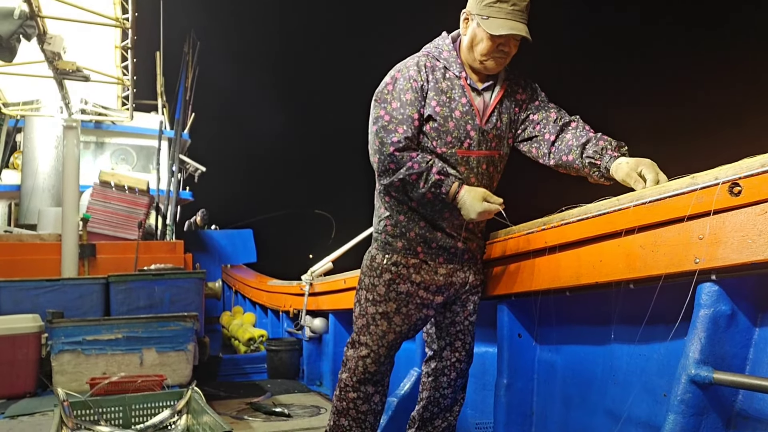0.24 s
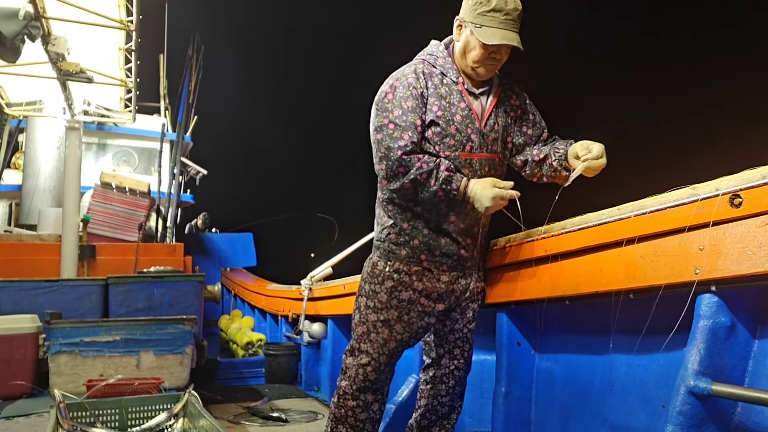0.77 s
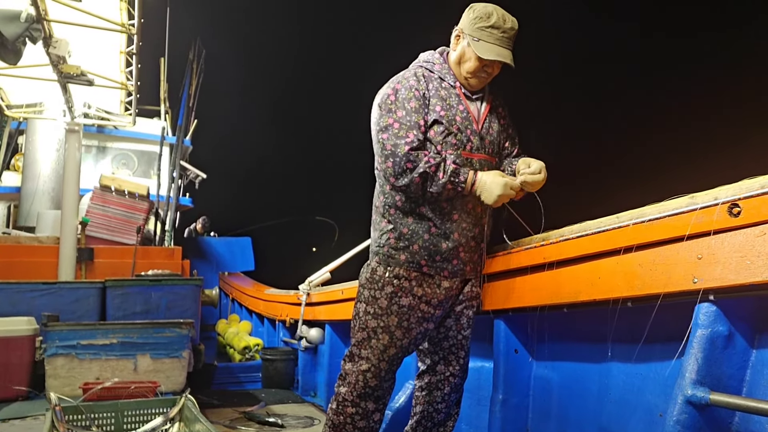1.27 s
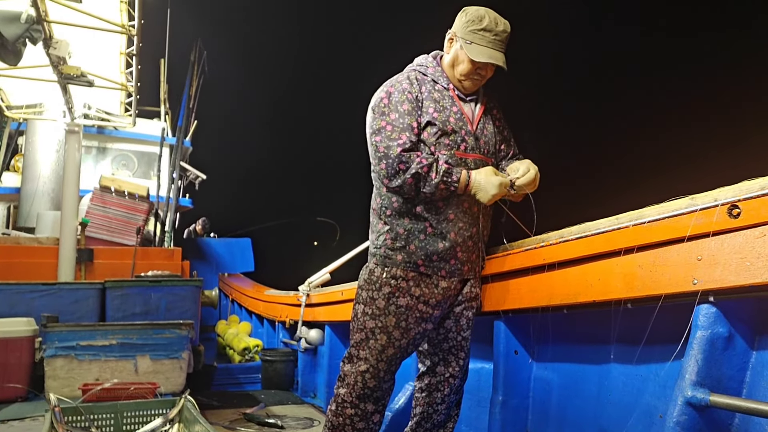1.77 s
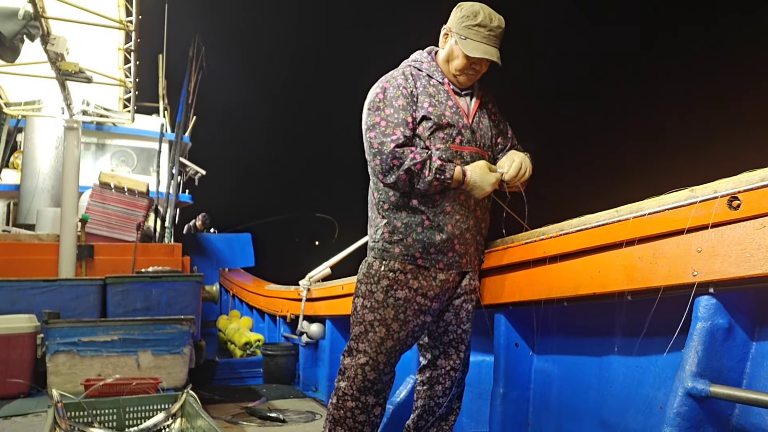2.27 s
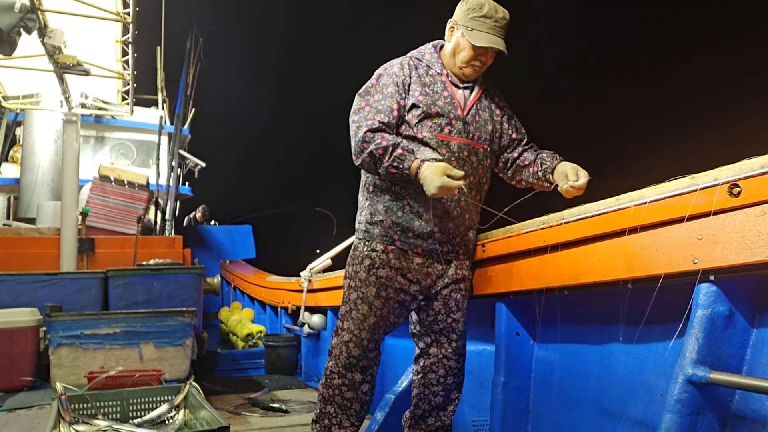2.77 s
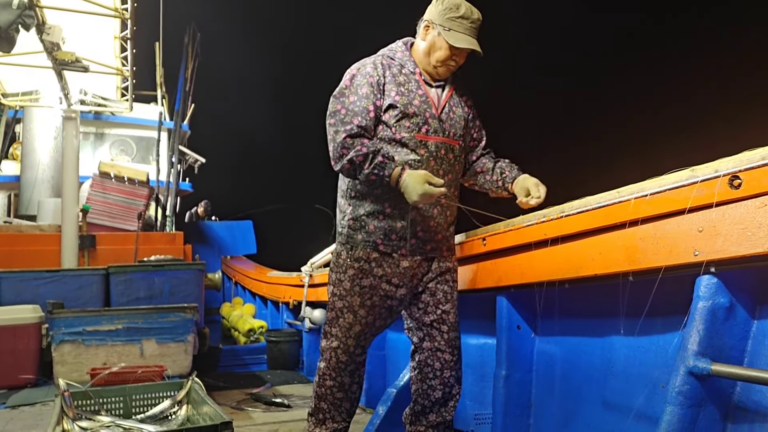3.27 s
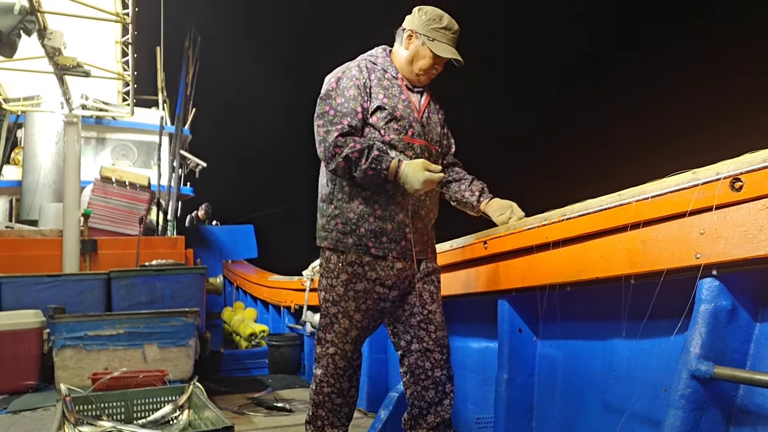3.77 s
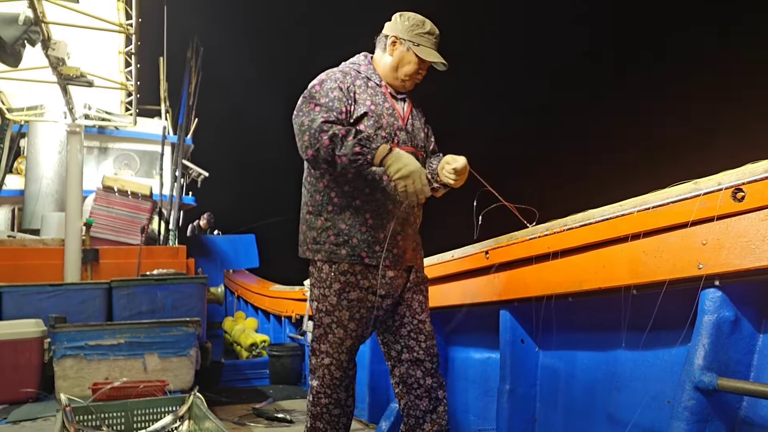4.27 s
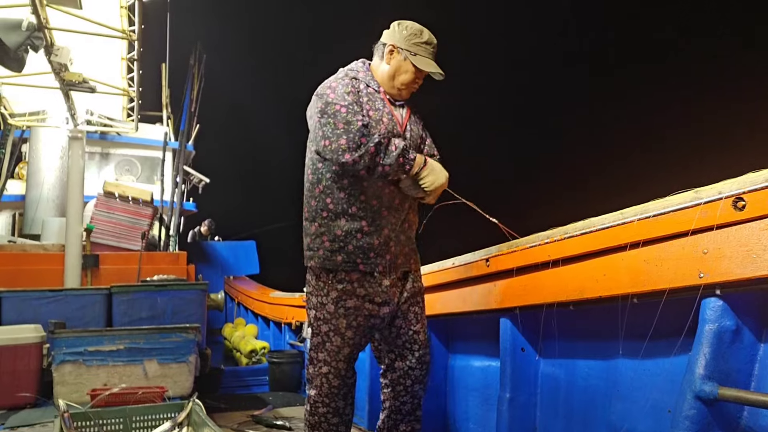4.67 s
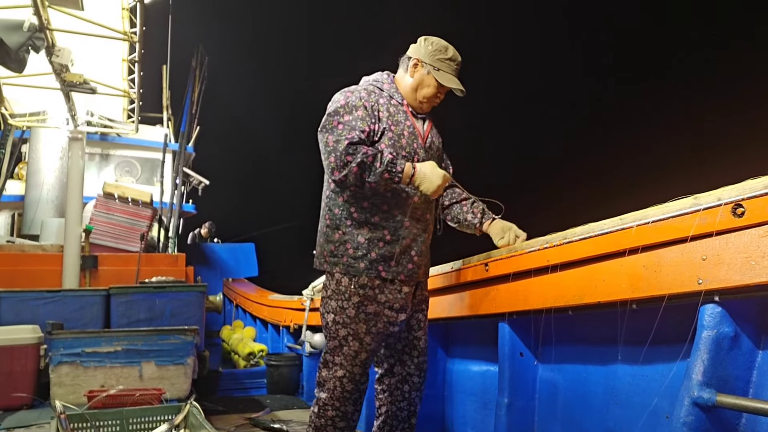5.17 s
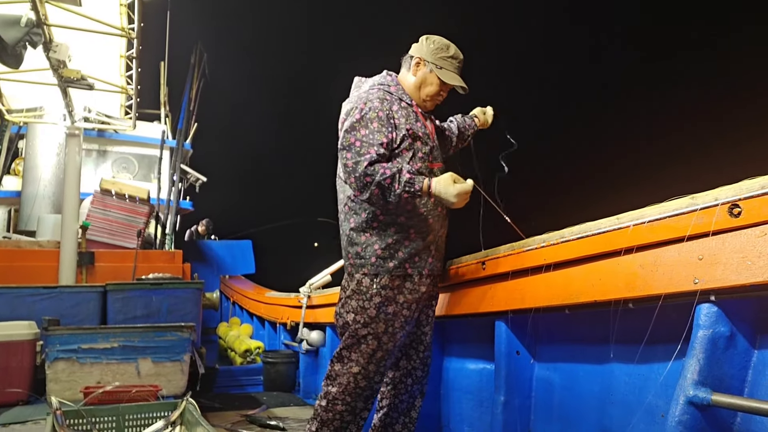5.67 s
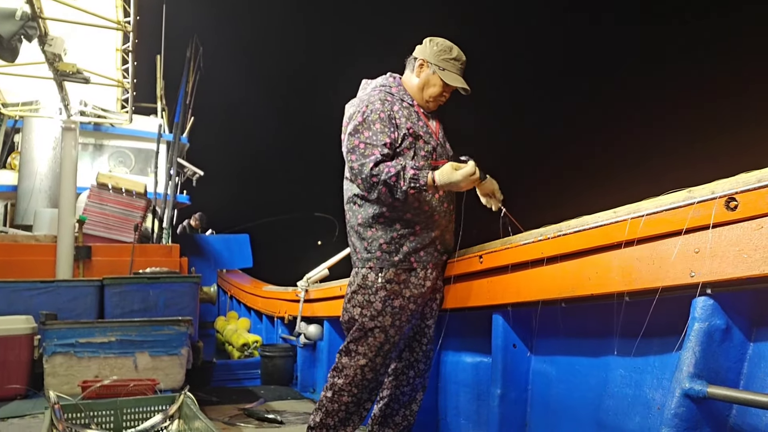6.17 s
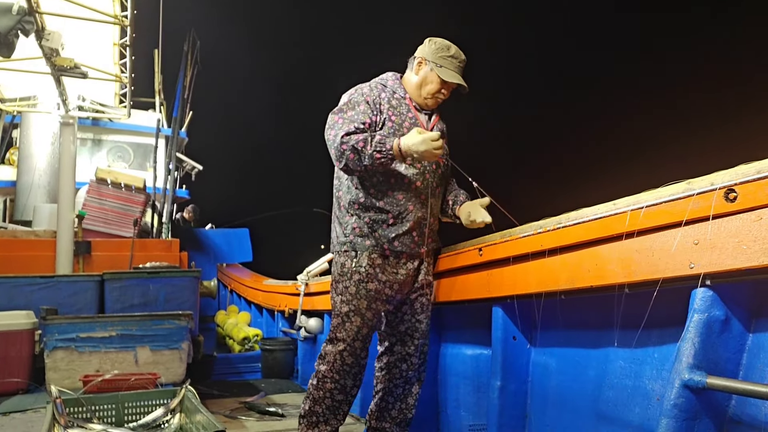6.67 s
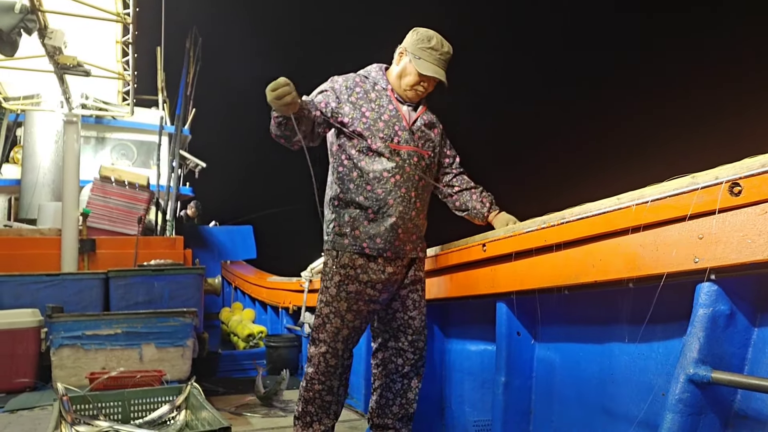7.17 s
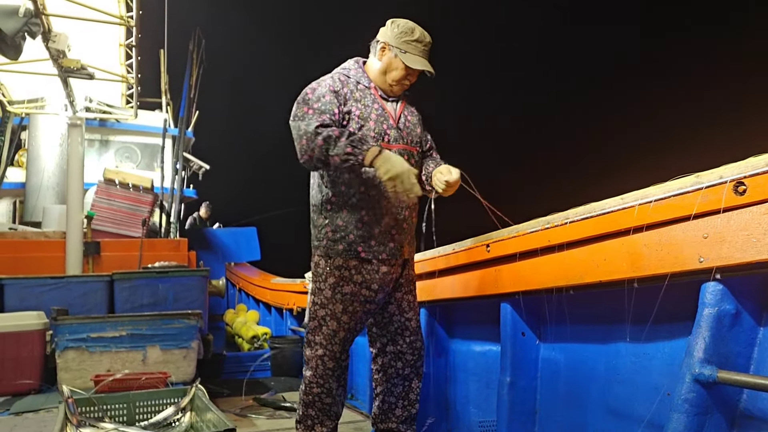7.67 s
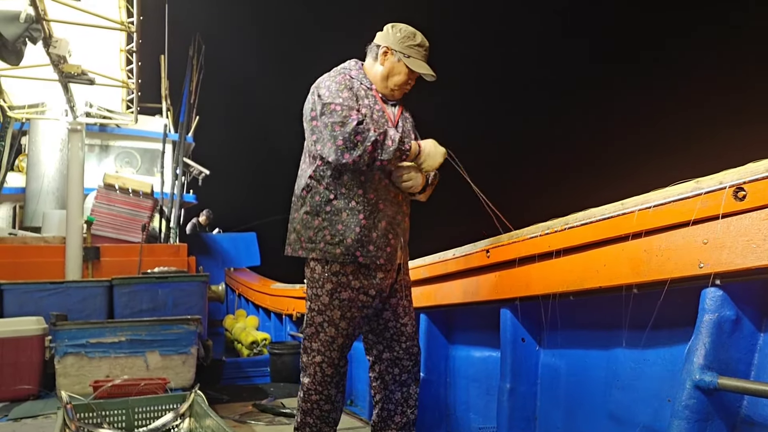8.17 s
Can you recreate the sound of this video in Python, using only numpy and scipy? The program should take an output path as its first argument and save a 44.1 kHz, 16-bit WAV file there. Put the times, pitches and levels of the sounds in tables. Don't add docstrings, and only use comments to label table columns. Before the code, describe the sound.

A boat's diesel engine drones low and steady through the hull, with clattering valve gear, soft water hiss and occasional tiny metal ticks.

```python
import sys
import numpy as np
from scipy import signal
from scipy.fft import rfft, irfft, next_fast_len
from scipy.io import wavfile
from scipy.ndimage import uniform_filter1d, map_coordinates

SR = 44100
rng = np.random.default_rng(int(sys.argv[2]) if len(sys.argv) > 2 else 0)


def store_wav(level_fs):
    pcm = np.round(np.clip(np.atleast_2d(level_fs), -1, 1) * 32767)
    wavfile.write(sys.argv[1], SR, pcm.T.astype(np.int16))


def amplitude_ratio(level_db):
    exponent = np.asarray(level_db, float) / 20
    return 10 ** exponent


N = 371763

# time in seconds, four-stroke cycles per second.
ENGINE_SPEED = [(0, 11.5493), (1, 11.5353), (2, 11.5234), (3.2, 11.5309), (4.4, 11.5311), (5.3, 11.5081),
                (8.4, 11.4961)]
# time in seconds, level in dB.
FIRING_LOAD = [(0, -30), (1.55, -29), (1.9, -24), (3.15, -28.5), (4.1, -26.5), (5.2, -29.5), (5.8, -25.5),
               (6.5, -26), (7.7, -32.5), (8.3, -26.5)]
# multiple of the cycle rate, rms level in dB.
EXHAUST_ORDERS = [(3, -56), (4, -42), (5, -39.5), (6, -28), (7, -37.5), (8, -37), (9, -37), (10, -44.5),
                  (11, -42.5), (12, -38), (13, -37.5), (14, -59), (15, -32), (16, -63), (17, -48),
                  (18, -42.5), (19, -61), (20, -48.5), (21, -50), (22, -63), (23, -53.5), (24, -64),
                  (25, -63), (26, -45.5), (27, -80), (28, -61), (29, -76), (30, -64), (31, -54.5),
                  (32, -48.5)]
# multiple of the cycle rate, rms level in dB.
BLOCK_ORDERS = [(33, -60), (34, -60), (35, -55.5), (36, -60), (37, -53), (38, -71), (39, -48.5), (40, -44),
                (41, -55.5), (42, -46), (43, -57.5), (44, -45.5), (45, -70), (46, -46), (47, -46),
                (48, -50.5), (49, -49.5), (51, -57)]
# thirds of the cycle rate, rms level in dB.
PUMP_ORDERS = [(14, -65), (23, -43), (25, -44.5), (52, -56), (67, -62), (68, -53.5), (70, -46), (76, -59.5),
               (77, -69), (79, -57), (83, -55.5), (85, -56)]
# frequency in
# Hz, rms level in dB.
STEADY_LINES = [(30.01, -57), (60.73, -42.5), (70.99, -44), (90.04, -42.5), (120.05, -44)]
PUFF_ARRIVAL = [(4.5, .87), (5.5, 1.01), (6.5, 1.25), (7.5, .75), (9.5, .73), (12.5, .58), (14.5, .6),
                (17.5, .4), (18.5, .77), (39, .82), (41, .72), (45, .95), (46.5, 1.11), (48.5, .81)]
# position as share of the cycle, level in dB.
HARD_FIRINGS = [(0.145, 0), (.5, -3), (0.799, -2)]
# frequency in Hz, gain in dB.
RUMBLE_COLOUR = [(5, -120), (20, -47), (35, -27), (70, 0.5), (105, -6.5), (165, 3.5), (188, -0.5),
                 (240, -1), (300, -15.5), (365, -2), (400, -15), (430, -24), (470, -35), (600, -120)]
# frequency in Hz, gain in dB.
CASING_COLOUR = [(300, -120), (400, -47), (435, -17), (458, 0), (500, 0), (540, 1.5), (580, -9), (700, -5),
                 (740, -15), (790, -13.5), (830, -39), (900, -47), (1200, -120)]
# frequency in Hz, gain in dB.
CAM_COLOUR = [(400, -120), (520, -36), (600, -2.5), (720, 0.5), (800, -11.5), (900, -16), (1030, -8.5),
              (1300, -15.5), (1700, -16), (2100, -42), (3000, -120)]
# centre in Hz, width in Hz, level in dB.
COVER_MODES = [(865, 21, 4), (1014, 52, 3.5), (1257, 62, 0.5), (1496, 36, -23), (1810, 58, 0.5),
               (1947, 117, 0.5), (2092, 44, 2)]
# centre in Hz, width in Hz, level in dB.
PIPE_MODES = [(2460, 110, -6), (2700, 90, -2.5), (2902, 80, -2.5), (3280, 68, 0.5), (3482, 71, 2.5),
              (3644, 46, -3.5), (3990, 98, -8), (4220, 150, -4.5), (4640, 80, -4.5), (4960, 104, -5.5),
              (5340, 57, -7), (6370, 200, -10.5), (7540, 230, -13.5)]
# frequency in Hz, gain in dB.
HISS_COLOUR = [(500, -120), (800, -4), (1400, -8), (2300, -8), (3100, -8.5), (4400, -10), (5200, -11.5),
               (5950, -16), (7600, -14.5), (8700, -19), (9900, -23), (12800, -19), (15600, -22.5),
               (18000, -120)]
# start in seconds, peak level in dB, pitch in Hz.
ROUGH_FIRINGS = [(0.59, -22, 538), (0.851, -26, 465), (1.112, -23.5, 538), (1.372, -19.5, 529),
                 (1.527, -19.5, 521), (1.795, -22, 495), (2.499, -26, 512), (2.673, -19, 544),
                 (2.8, -24, 505), (3.177, -21.5, 520), (3.939, -26, 545), (4.061, -21, 544),
                 (4.303, -22.5, 463), (5.243, -24, 506), (5.43, -23, 547), (5.624, -25, 526),
                 (5.969, -23, 531), (6.059, -24.5, 537), (6.142, -23.5, 533), (6.391, -21, 497),
                 (7.02, -26.5, 522), (7.925, -21, 523), (8.129, -25.5, 510), (8.407, -21.5, 528)]
# start in seconds, peak level in dB, pitch in Hz, left over right in dB.
TACKLE_TICKS = [
    (0.6894, -39, 1560, 0.5),
    (1.3463, -37.5, 2100, 13),
    (2.3194, -45, 1900, 2.5),
    (2.9896, -36, 1820, -4),
    (3.5997, -38, 1840, 3),
    (4.1344, -41, 2080, -1),
    (7.9399, -38, 2130, 13),
    (8.1194, -40, 2100, 6),
    (8.2896, -42, 2000, 8),
]
# frequency in Hz, left-right likeness from 0 to 1.
LIKENESS = [(60, .98), (130, 1), (290, 0.19), (600, 1), (1000, 0.46), (2000, 0.3), (4000, 0.27),
            (8000, 0.09)]
# frequency in Hz, lead of the left in radians.
PORT_LEAD = [(60, -.3), (250, -.2), (450, .7), (690, .7), (950, 1.9), (1810, 2.4), (3530, 5.5), (4050, 5.1),
             (4820, 8.6)]
# frequency in Hz, left over right in dB.
PORT_BALANCE = [(60, 0.0), (110, -0.5), (200, -1.0), (380, 2.5), (700, 3.5), (1290, 1.5), (2380, 0.5),
                (4400, 1.5), (8120, 3.0), (15000, -1.0)]

SIDES = np.array([[.5], [-.5]])
TONE_STEP = 16
ROLL_S, ROLL_CREST_S = 3.73, 1.23
VALVES_DB, HISS_DB, CASING_DB = -51.5, -50.5, -35.5
VALVES_ROLL_DB, HISS_ROLL_DB, CASING_ROLL_DB = 1.5, 0.9, 0.86
CYLINDERS = 6
INJECT_DB, INJECT_SHARE = 1.6, .05


def unit(x):
    return x / np.sqrt(np.mean(x ** 2) + 1e-20)


def along(points, hz):
    f, v = np.transpose(points)
    return np.interp(np.log(hz + 1), np.log(f + 1), v)


def colour(points):
    return lambda hz: amplitude_ratio(along(points, hz))


def over_time(rows):
    s, v = np.transpose(rows)
    return np.interp(np.arange(N) / SR, s, v)


def wobble(rate, size=1):
    coarse = np.arange(0, N + 64, 64)
    knots = map_coordinates(rng.standard_normal(int(N * rate / SR) + 4), [coarse * rate / SR])
    return np.interp(np.arange(0, N, size), coarse, knots)


def noise_pair():
    return rng.standard_normal((2, N))


def filtered(x, response):
    m = next_fast_len(N + 8192)
    spectrum = rfft(x, m) * response(np.fft.rfftfreq(m, 1 / SR))
    return irfft(spectrum, m)[..., :N]


def spread(pair, gain):
    def mid_side_gain(hz):
        angle = np.arccos(np.clip(along(LIKENESS, hz), -1, 1)) / 2
        return gain(hz) * [np.cos(angle), np.sin(angle)]
    mid, side = filtered(pair, mid_side_gain)
    return unit(np.array([mid + side, mid - side]))


def tones(turns, table, sway_db, slip, scatter_db, scatter_rad, locked=False):
    slow = turns[::TONE_STEP]
    delay = np.cumsum(np.interp(np.arange(60) - .5, *np.transpose(PUFF_ARRIVAL)))
    out = np.zeros((2, len(slow)))
    for k, db in table:
        start, tilt, lag = rng.uniform(), rng.standard_normal(), rng.standard_normal()
        smear = .6 * (start - .5) * (19 < k < 38)
        offset = delay[round(k)] + smear if locked else start
        level = amplitude_ratio(db + sway_db * wobble(4.5, size=TONE_STEP) + SIDES * scatter_db * tilt)
        drift = slip * wobble(2.97, size=TONE_STEP) + SIDES * scatter_rad * lag
        out += np.sqrt(2) * level * np.cos(2 * np.pi * (k * slow - offset) + drift)
    return signal.resample_poly(out, TONE_STEP, 1, axis=1)[:, :N]


def hum(turns, firing_db):
    firing = tones(turns, [(6, -0.29)], sway_db=0.0, slip=.1, scatter_db=-4.0, scatter_rad=0, locked=True)
    others = [row for row in EXHAUST_ORDERS if round(row[0]) != 6]
    exhaust = tones(turns, others, sway_db=2.2, slip=.18, scatter_db=2.2, scatter_rad=.3, locked=True)
    block = tones(turns, BLOCK_ORDERS, sway_db=2.2, slip=.3, scatter_db=1.5, scatter_rad=.3, locked=True)
    pump = tones(turns / 3, PUMP_ORDERS, sway_db=1.5, slip=.2, scatter_db=1.5, scatter_rad=.3)
    seconds = np.arange(N) / SR
    steady = tones(seconds, STEADY_LINES, sway_db=1.5, slip=.2, scatter_db=1.5, scatter_rad=.2)
    return amplitude_ratio(firing_db) * firing + exhaust + block + pump + steady


def knocks(turns, fall_db):
    return sum(amplitude_ratio(db - fall_db * ((turns - share) % 1)) for share, db in HARD_FIRINGS)


def casing(turns, casing_db):
    rumble = spread(noise_pair(), colour(RUMBLE_COLOUR))
    burn = noise_pair() * (0.59 + knocks(turns, fall_db=44)) * amplitude_ratio(0.46 * wobble(10))
    return amplitude_ratio(-36) * rumble + amplitude_ratio(casing_db) * spread(burn, colour(CASING_COLOUR))


def rattle(turns, modes, share, beat_db, patchy_db, jolt_db):
    z = signal.stft(noise_pair(), nperseg=512)[2]
    patches = uniform_filter1d(rng.standard_normal(z.shape[1:]), size=2, axis=0)
    patches = uniform_filter1d(patches, size=5, axis=1)
    shake = signal.istft(z * amplitude_ratio(patchy_db * unit(patches)), nperseg=512)[1][:, :N]
    beat = beat_db * np.cos(2 * np.pi * (turns - share)) * (1 + 0.26 * wobble(6.2))
    beat = beat + 0.83 * wobble(45)
    jolt = jolt_db * np.cos(2 * np.pi * CYLINDERS * (turns - INJECT_SHARE))

    def resonances(hz):
        return sum(amplitude_ratio(db) / (1 + ((hz - centre) / width * 2) ** 2) for centre, width, db in modes)
    return spread(shake * amplitude_ratio(beat + jolt), resonances)


def valve_train(turns, valves_db):
    angle = np.linspace(0, 1, 4000)
    one_cycle = rng.standard_normal((2, len(angle)))
    blows = np.array([np.interp(turns % 1, angle, row) for row in one_cycle])
    cams = spread(blows * (0.46 + knocks(turns, fall_db=39)), colour(CAM_COLOUR))
    covers = rattle(turns, COVER_MODES, share=.61, beat_db=2, patchy_db=1.5, jolt_db=.6)
    pipes = rattle(turns, PIPE_MODES, share=.71, beat_db=3, patchy_db=3.5, jolt_db=INJECT_DB)
    return amplitude_ratio(-46) * cams + amplitude_ratio(valves_db) * covers + amplitude_ratio(-55) * pipes


def water(turns, hiss_db):
    pulse_db = 0.13 * np.cos(2 * np.pi * (turns - .78)) + 0.27 * wobble(8.8)
    return amplitude_ratio(hiss_db + pulse_db) * spread(noise_pair(), colour(HISS_COLOUR))


def pings():
    out, t = np.zeros(N + SR), np.arange(SR // 10) / SR
    for s, db, hz in ROUGH_FIRINGS:
        ring = np.sin(2 * np.pi * hz * t)
        ring += .5 * np.sin(2 * np.pi * hz * .88 * t + rng.uniform(0, 2 * np.pi))
        shape = amplitude_ratio(db + .5 - 60 * t / .13) * (1 - np.exp(-t / .002))
        out[round(s * SR):][:len(t)] += shape * ring
    return out[:N]


def tackle():
    out, t = np.zeros((2, N + SR)), np.arange(SR // 10) / SR
    for s, db, hz, pan_db in TACKLE_TICKS:
        ring = np.sin(2 * np.pi * hz * t) + 0.45 * np.sin(2 * np.pi * hz * 1.12 * t)
        shape = amplitude_ratio(db - 4 - 60 * t / 0.078) * (1 - np.exp(-t / 0.0025))
        out[:, round(s * SR):][:, :len(t)] += amplitude_ratio(SIDES * pan_db) * ring * shape
    return out[:, :N]


def scene():
    turns = np.cumsum(over_time(ENGINE_SPEED)) / SR
    roll = np.cos(2 * np.pi * (np.arange(N) / SR - ROLL_CREST_S) / ROLL_S)
    mix = hum(turns, over_time(FIRING_LOAD))
    mix = mix + casing(turns, CASING_DB + CASING_ROLL_DB * roll)
    mix = mix + valve_train(turns, VALVES_DB + VALVES_ROLL_DB * roll)
    mix = mix + water(turns, HISS_DB + HISS_ROLL_DB * roll)
    return mix + pings() + tackle()


def low_pass(x):
    return signal.sosfilt(signal.butter(12, 15670, fs=SR, output="sos"), x)


def record(dry):
    def ports(hz):
        return amplitude_ratio(SIDES * along(PORT_BALANCE, hz)) * np.exp(1j * SIDES * along(PORT_LEAD, hz))
    return low_pass(filtered(dry, ports))


dry = scene()
out = record(dry)
store_wav(out)
```